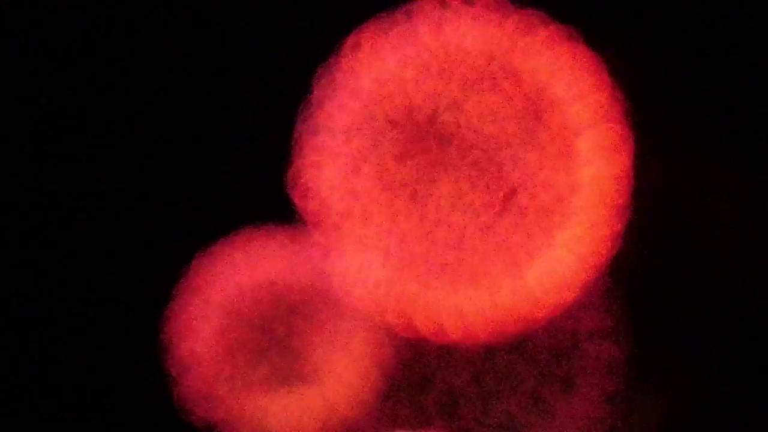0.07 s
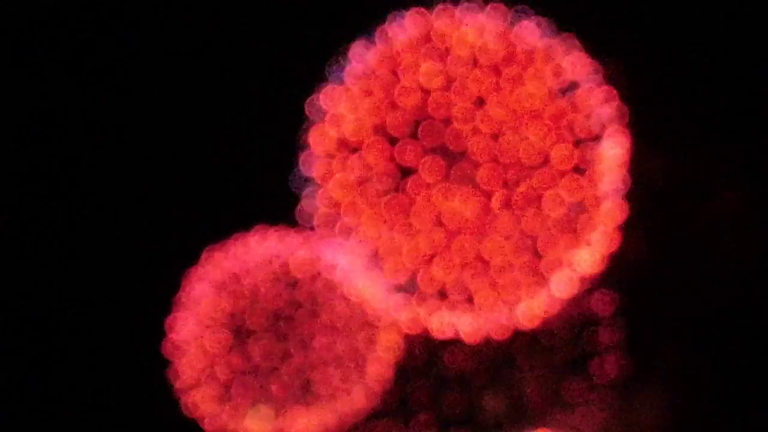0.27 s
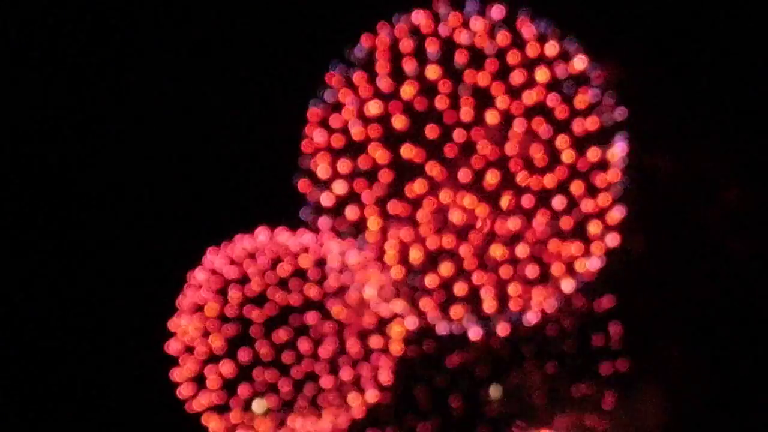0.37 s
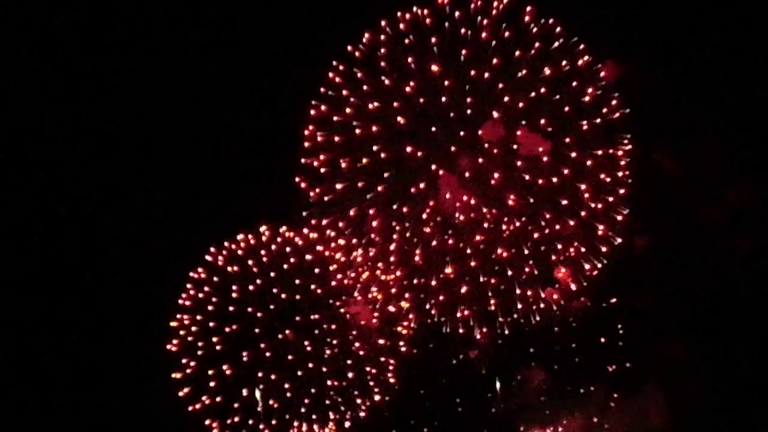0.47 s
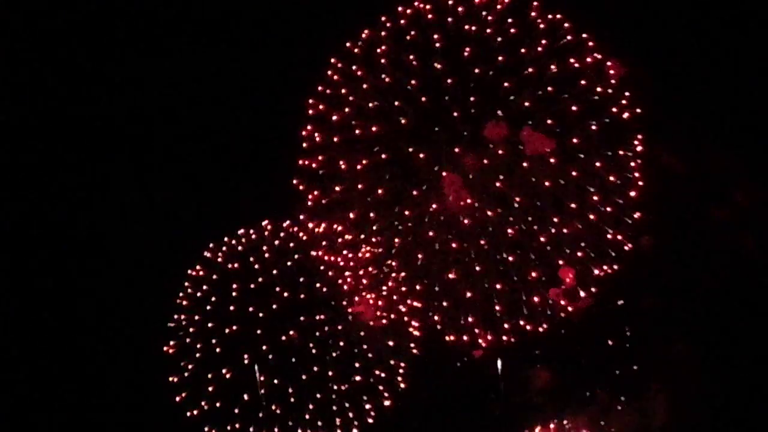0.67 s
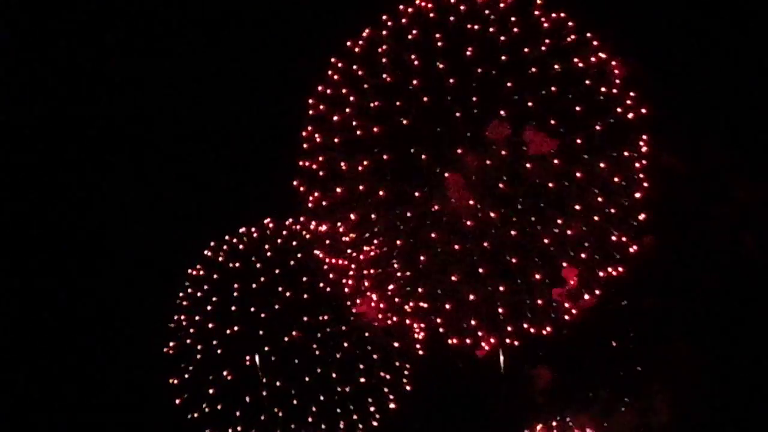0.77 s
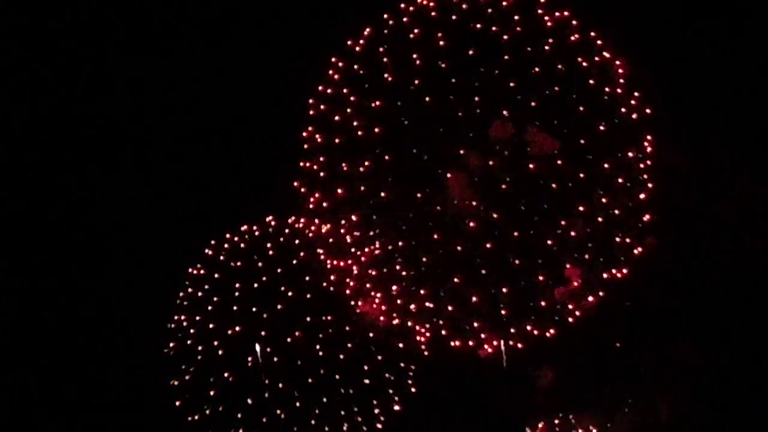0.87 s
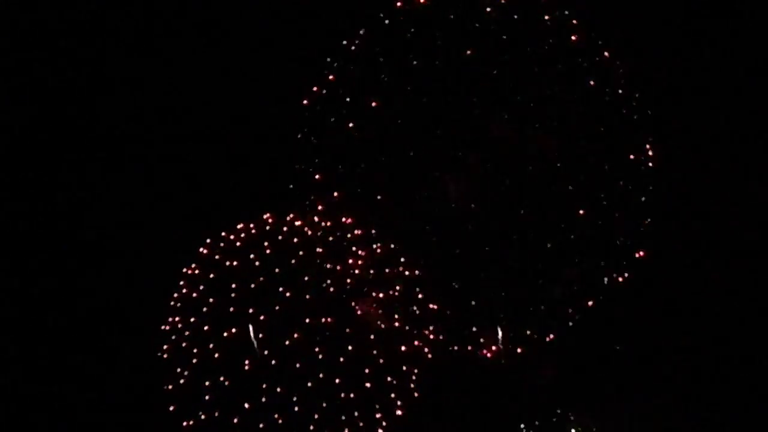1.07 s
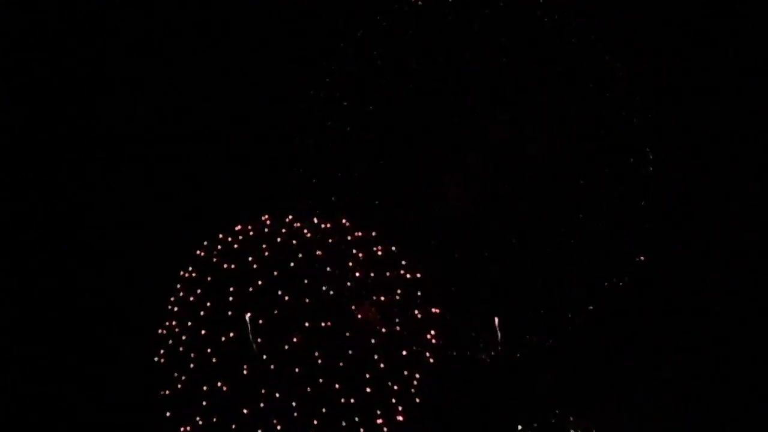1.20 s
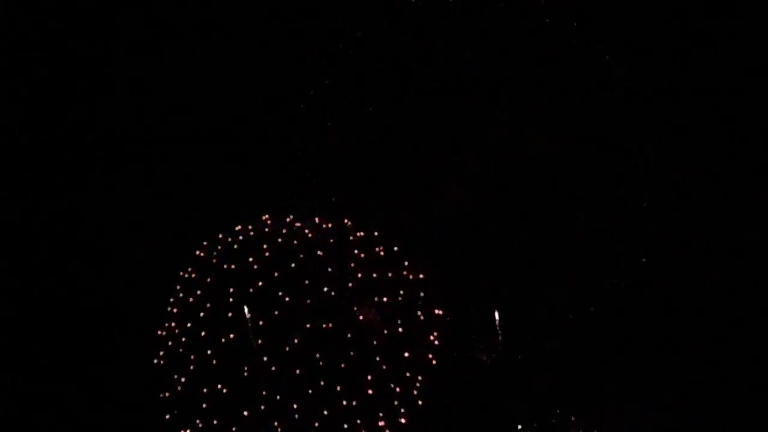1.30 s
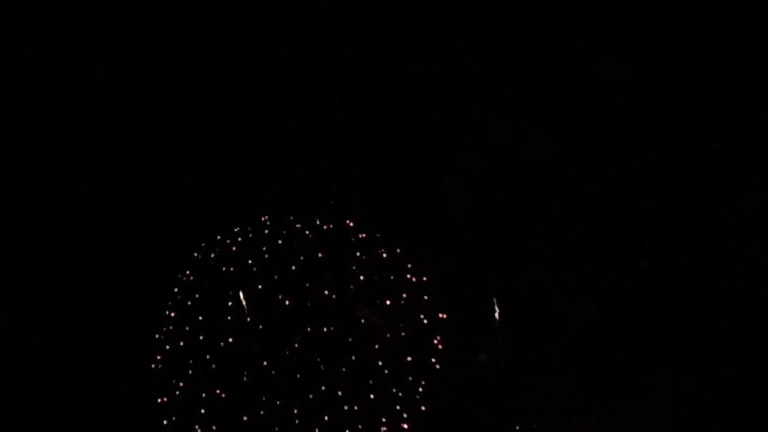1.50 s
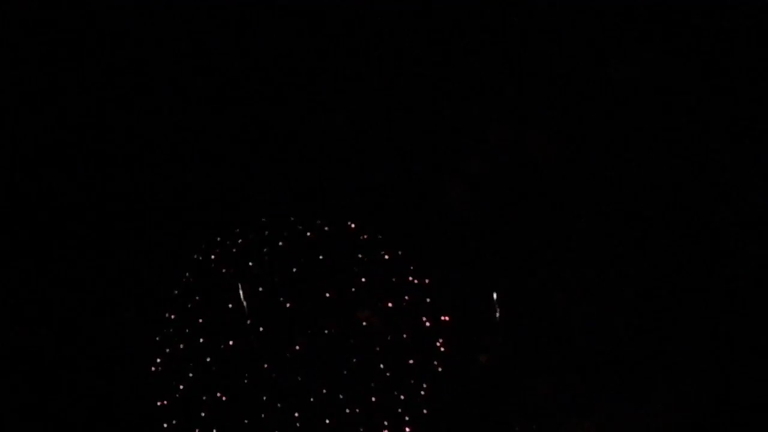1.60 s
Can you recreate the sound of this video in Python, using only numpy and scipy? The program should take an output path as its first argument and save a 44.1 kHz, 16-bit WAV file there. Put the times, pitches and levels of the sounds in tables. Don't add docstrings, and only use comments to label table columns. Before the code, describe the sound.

Aerial fireworks heard outdoors from far below on a small camera microphone: faint motor ticking first, a huge overloaded bang, clusters of muffled pops, then two softer deep booms whose rumble fades into quiet night air.

```python
import sys
import numpy as np
from scipy import signal
from scipy.fft import rfft, irfft
from scipy.io import wavfile
from scipy.ndimage import uniform_filter1d

SR = 44100
rng = np.random.default_rng(int(sys.argv[2]) if len(sys.argv) > 2 else 0)


def store_pcm(level_fs):
    pcm = np.round(np.clip(level_fs, -1, 1) * 32767).astype(np.int16)
    wavfile.write(sys.argv[1], SR, np.atleast_2d(pcm).T)


def decibels_to_gain(level_db):
    exponent = np.asarray(level_db, float) / 20
    return 10 ** exponent


N = 72765

# pitch_hz, level_db (per Hz)
AIR_COLOUR = [(12, -25), (28, -13.5), (55, -9.5), (100, -15.5), (240, -20), (520, -28.5), (940, -32),
              (1350, -28), (3500, -46)]
# pitch_hz, level_db (per Hz)
HISS_COLOUR = [(1470, 0), (2500, -7.5), (3600, -10), (5610, -9.5), (6060, -12), (14900, -13.5),
               (16000, -22)]
AIR_DB, HISS_DB = -44, -65.5

# pitch_hz, width_hz, level_db
CASING_RINGS = [(3710, 210, -3.5), (4590, 330, -1), (5020, 520, 0.5), (5450, 400, -2), (6030, 500, -9),
                (7870, 380, -9), (10400, 1300, -7), (15400, 500, -9.5)]
LAST_STEPS = (.4335, .453)
STEP_FIRST_S, STEP_EVERY_S, STEP_LENGTH_S = -0.014, 0.0206, 0.015
STEP_COUNT, STEP_DB = 21, -60.5

# start_s, level_db, body_hz, spread_s, snap_db (relative to the body)
DISTANT_POPS = [(0.224, -55, 154, 0.0072, 0.5), (0.498, -30, 214, 0.021, -12.5),
                (.645, -41, 190, 0.025, -8.5), (.706, -33, 161.5, 0.029, -13),
                (.714, -38.5, 396, 0.031, -15), (0.886, -43, 378, 0.011, -8.5),
                (1.003, -33.5, 317, 0.023, -22.5), (1.006, -38, 414, 0.017, -19),
                (1.086, -42.5, 306, .025, -10), (1.099, -41, 160, 0.12, -12), (1.33, -37, 231, 0.044, -26),
                (1.503, -46, 343, .02, -18), (1.547, -56.5, 148, .02, 7), (1.625, -34.5, 100, 0.041, -43)]
POP_WIDTH = 0.45
POP_GAP_S, POP_T60_S, POP_TAIL = 0.0065, 0.16, 0.35

# start_s, push_db, push_s, rebound_db, rebound_s
PRESSURE_JUMPS = [
    (0.2471, -2.5, 0.0038, -2.5, 0.0066),
    (0.7949, -15, 0.0038, -9.5, 0.0075),
    (1.2407, -9, 0.0054, -5.5, 0.0061),
]
# slide_lag_s, slide_rise_s, slide_db, roll_db
WAKE_OF_JUMPS = [
    (0.0046, .045, -12, -21),
    (0.0018, 0.011, -17.5, -26.5),
    (0.00098, 0.012, -15.5, -25.5),
]
# crack_db, slap_db, slap_pitch_share, rebound_skew (under 1 peaks early, over 1 late)
CRACK_AND_SLAP = [
    (-15.5, -22.5, 0.945, 0.66),
    (-30.5, -28.5, 1.06, 0.57),
    (-31.5, -23.5, 0.968, 1.07),
]
# pitch_hz, level_db (per Hz)
CRACK_COLOUR = [(120, -9.5), (300, -7), (780, -21), (1100, -18), (1700, -19.5), (2600, -33), (3600, -41.5),
                (6000, -77), (9000, -110)]
CRACK_T60_S = 0.032
# pitch_hz, width_hz, level_db
SLAP_RINGS = [(235, 79, -1.5), (387.5, 36.5, -1), (528, 170, -10.5), (770, 280, -21)]
SLAP_HOLD_S, SLAP_T60_S = 0.026, 0.042
SLIDE_HIGH_HZ, SLIDE_LOW_HZ, SLIDE_S = 90.7, 46.1, 0.0385
SLIDE_HOLD_S, SLIDE_T60_S = 0.054, 0.23
# delay_s, length_s, pitch_hz, level_db (relative to the slide)
WALL_ECHOES = [
    (.08, .058, 100, -8),
    (.115, .09, 45, -11),
    (.155, .05, 115, -17),
]
# pitch_hz, level_db (per Hz)
ROLL_COLOUR = [(15, -47), (30, 1), (60, -4.5), (110, -11), (200, -13.5), (400, -21), (660, -30.5),
               (1500, -43), (4000, -61), (6000, -100)]
# pitch_hz, fade_s
ROLL_FADE = [(30, 0.79), (120, 1.76), (400, 0.76), (1200, 1.23), (4000, 0.34)]
ROLL_RISE_S, ROLL_PATCH_DB = 0.0063, 2

FAR_EDGE_HZ = 3800
TOP_EDGE_HZ = 15780
KNEE, HEADROOM = 0.5, 0.17


def evened(x):
    return x / np.sqrt(np.mean(x ** 2) + 1e-20)


def read(points, hz):
    f, value = np.transpose(points)
    return np.interp(np.log(hz + 1), np.log(f + 1), value)


def add(mix, s, sound):
    at = round(s * SR)
    sound = sound[max(-at, 0):]
    part = mix[max(at, 0):][:len(sound)]
    part += sound[:len(part)]


def coloured_noise(count, points):
    hz = np.fft.rfftfreq(count, 1 / SR)
    spectrum = rfft(rng.standard_normal(count)) * decibels_to_gain(read(points, hz))
    return evened(irfft(spectrum, count))


def resonate(x, hz, width):
    turn = np.exp(2j * np.pi * hz * np.arange(len(x)) / SR)
    r = np.exp(-np.pi * width / SR)
    return 2 * (turn * signal.lfilter([1 - r], [1, -r], x / turn)).real


def ring_twice(x, hz, width):
    return resonate(resonate(x, hz, width), hz, 2 * width)


def bump(t, start, length, skew=1):
    return abs(np.sin(np.pi * np.clip((t - start) / length, 0, 1) ** skew))


def fade(time, t60):
    return decibels_to_gain(-60 * np.maximum(time, 0) / t60)


def to_patches(x):
    return signal.stft(x, SR, nperseg=1024, noverlap=768)


def from_patches(z):
    return signal.istft(z, SR, nperseg=1024, noverlap=768)[1]


def drift(shape, bands, moments):
    across = uniform_filter1d(rng.standard_normal(shape), bands, axis=0)
    return evened(uniform_filter1d(across, moments, axis=1))


def air():
    _, _, z = to_patches(coloured_noise(N, AIR_COLOUR + [(5000, -58)]))
    wash = from_patches(z * decibels_to_gain(1.3 * drift(z.shape, 10, 12)))[:N]
    return decibels_to_gain(AIR_DB) * evened(wash)


def hiss():
    flicker = evened(uniform_filter1d(rng.standard_normal(N), 1500))
    return decibels_to_gain(HISS_DB + 0.34 * flicker) * coloured_noise(N, [(1500, -35)] + HISS_COLOUR)


def focus_motor():
    t, gate = np.arange(N) / SR, np.zeros(N)
    starts = np.append(STEP_FIRST_S + STEP_EVERY_S * np.arange(STEP_COUNT), LAST_STEPS)
    for s, (db, late) in zip(starts, rng.standard_normal((len(starts), 2))):
        gate += decibels_to_gain(0.5 * db) * bump(t, s + 0.00028 * late, STEP_LENGTH_S) ** 0.34
    teeth = rng.standard_normal(N) * (rng.random(N) < 12000 / SR)
    ring = sum(decibels_to_gain(db) * evened(ring_twice(teeth, hz, width)) for hz, width, db in CASING_RINGS)
    return decibels_to_gain(STEP_DB) * gate * evened(ring)


def pop(start, db, hz, spread, snap_db):
    t = np.arange(8000) / SR
    held = t < spread + 0.004
    late, size = rng.random((20, 2)).T
    order = np.arange(20)
    at = (order + 0.707 * late * (order > 0)) * POP_GAP_S
    heard = at < spread
    push = (-1.0) ** order * (0.81 + 0.3 * size)
    knocks = np.zeros(8000)
    knocks[(at[heard] * SR).astype(int)] = push[heard]
    tail = rng.standard_normal(8000) * fade(t - spread, POP_T60_S)
    drive = knocks / knocks[held].std() + POP_TAIL * tail
    body = ring_twice(drive, hz, POP_WIDTH * hz)
    snap = resonate(resonate(drive + tail * held, 2.07 * hz, 2.9 * hz), 2.07 * hz, 0.91 * hz)
    return start, decibels_to_gain(db) * (body / body[held].std() + decibels_to_gain(snap_db) * snap / snap[held].std())


def pressure_jump(t, push_db, push, rebound_db, rebound, skew):
    swing_back = decibels_to_gain(rebound_db) * bump(t, push, rebound, skew) ** 1.28
    return swing_back - decibels_to_gain(push_db) * bump(t, 0, push) ** 2.17


def ground_slap(t, share):
    noise = rng.standard_normal(SR)
    rings = sum(decibels_to_gain(db) * evened(resonate(resonate(noise, share * hz, width), share * hz, 2 * width))
                for hz, width, db in SLAP_RINGS)
    return rings * fade(t - SLAP_HOLD_S, SLAP_T60_S)


def sliding_wave(t, lag, rise):
    late = np.maximum(t - lag, 0)
    hz = SLIDE_LOW_HZ + (SLIDE_HIGH_HZ - SLIDE_LOW_HZ) * np.exp(-(late / SLIDE_S) ** 2)
    turns = np.cumsum(hz * (t > lag)) / SR - 0.52
    shape = np.minimum(late / rise, 1) * fade(late - SLIDE_HOLD_S, SLIDE_T60_S)
    low = shape * np.cos(2 * np.pi * turns)
    for delay, length, echo_hz, db in WALL_ECHOES:
        low += decibels_to_gain(db) * bump(t, delay, length) * np.sin(2 * np.pi * echo_hz * (t - delay))
    return low


def rolling_tail(t):
    f, times, z = to_patches(coloured_noise(SR, ROLL_COLOUR))
    fading_db = -60 * times / read(ROLL_FADE, f)[:, None]
    z = z * decibels_to_gain(ROLL_PATCH_DB * drift(z.shape, 12, 5) + fading_db)
    return from_patches(z)[:SR] * np.minimum(t / ROLL_RISE_S, 1) ** 2


def boom(start, push_db, push, rebound_db, rebound, lag, rise, slide_db, roll_db,
         crack_db, slap_db, share, skew):
    t = np.arange(SR) / SR
    onset = np.minimum(t / push, 1) ** 2
    sound = pressure_jump(t, push_db, push, rebound_db, rebound, skew)
    sound += decibels_to_gain(crack_db) * coloured_noise(SR, CRACK_COLOUR) * onset * fade(t - push, CRACK_T60_S)
    sound += decibels_to_gain(slap_db) * ground_slap(t, share) * onset
    sound += decibels_to_gain(slide_db) * sliding_wave(t, lag, rise)
    sound += decibels_to_gain(roll_db) * rolling_tail(t)
    return start, sound


def scene():
    far = np.zeros(N)
    for row in DISTANT_POPS:
        add(far, *pop(*row))
    for jump, wake, crack in zip(PRESSURE_JUMPS, WAKE_OF_JUMPS, CRACK_AND_SLAP):
        add(far, *boom(*jump, *wake, *crack))
    dulled = signal.sosfilt(signal.butter(4, FAR_EDGE_HZ, fs=SR, output="sos"), far)
    return (air() + hiss() + focus_motor() + dulled)[None]


def band_limit(x):
    return signal.sosfilt(signal.butter(12, 16170, fs=SR, output="sos"), x)


def record(dry):
    over = np.maximum(abs(dry) - KNEE, 0)
    limited = np.sign(dry) * (np.minimum(abs(dry), KNEE) + HEADROOM * np.tanh(over / HEADROOM))
    edge = signal.firwin(1023, TOP_EDGE_HZ, window=("kaiser", 9), fs=SR)
    mix = signal.oaconvolve(limited, edge[None], "same")
    return band_limit(mix)


dry = scene()
out = record(dry)
store_pcm(out)
```